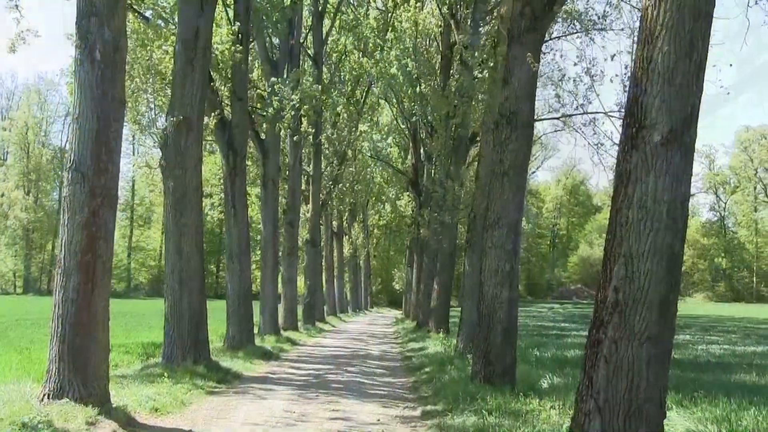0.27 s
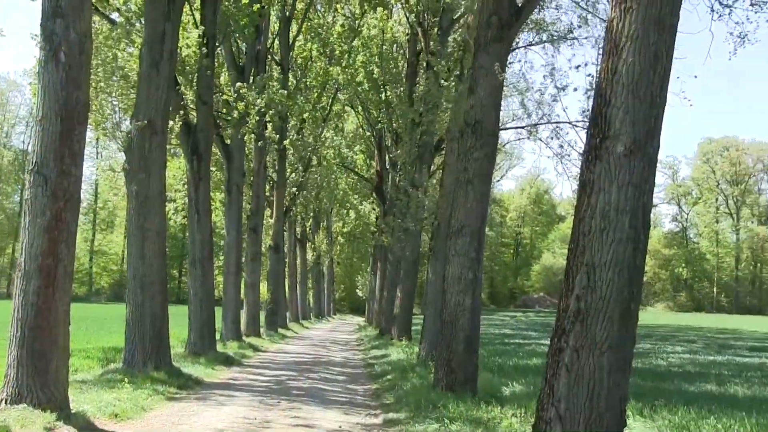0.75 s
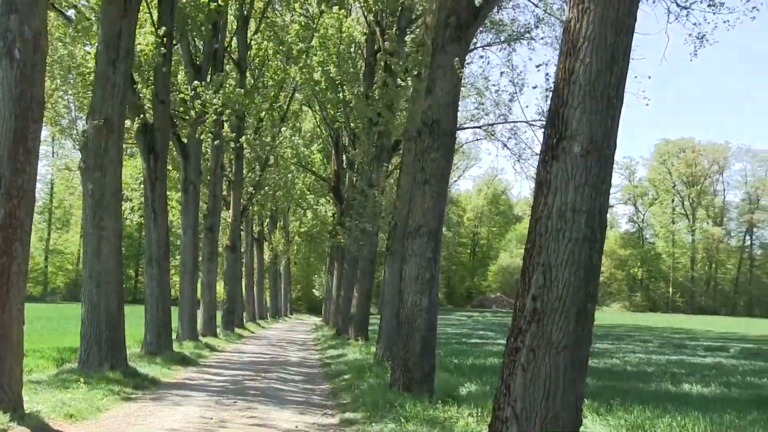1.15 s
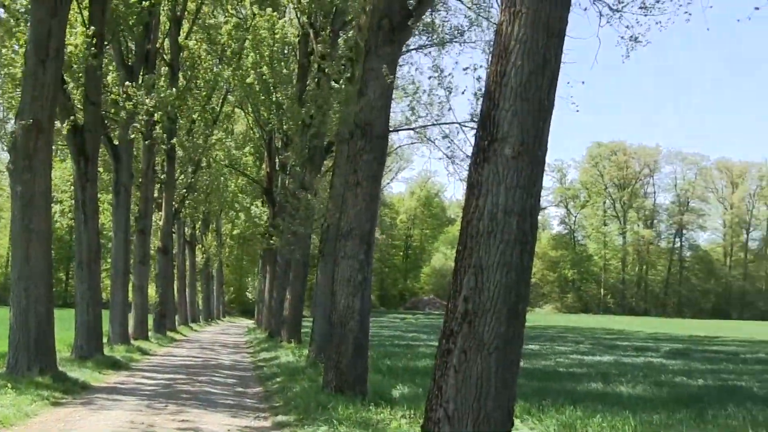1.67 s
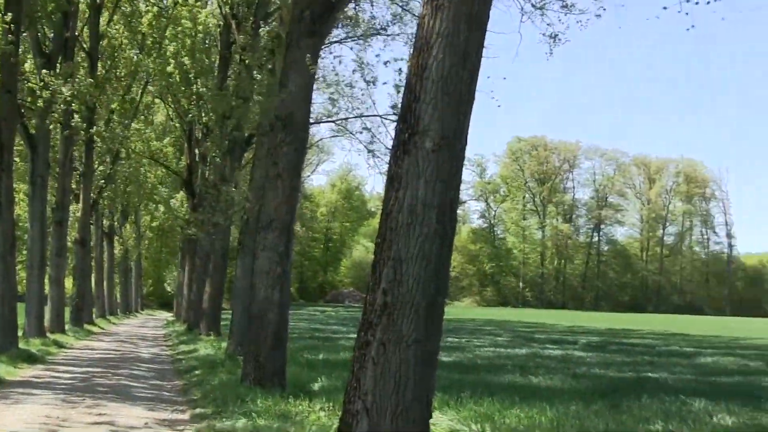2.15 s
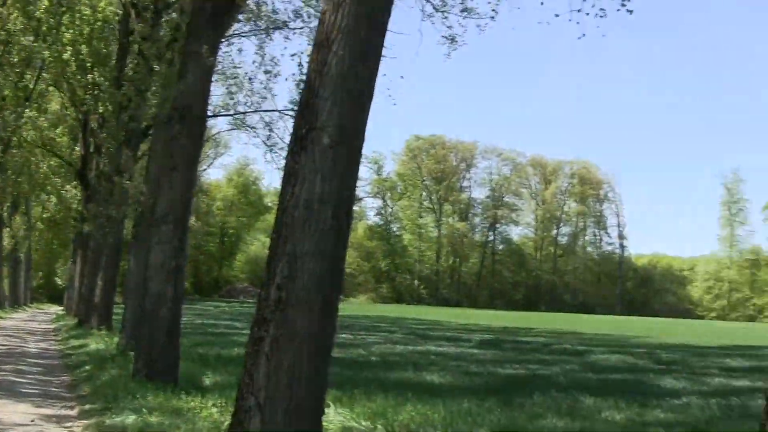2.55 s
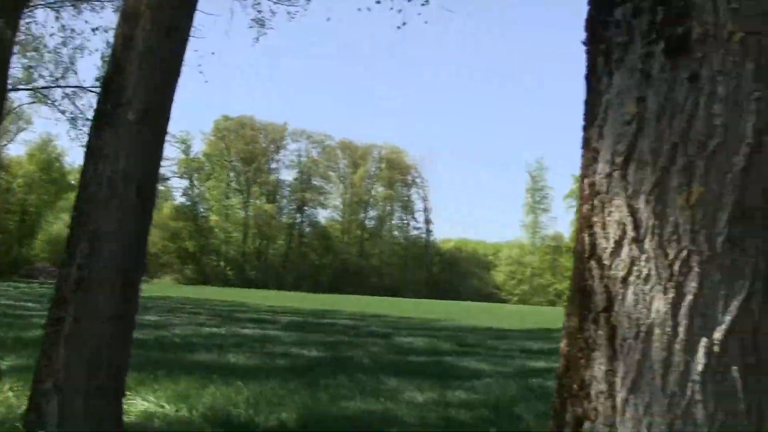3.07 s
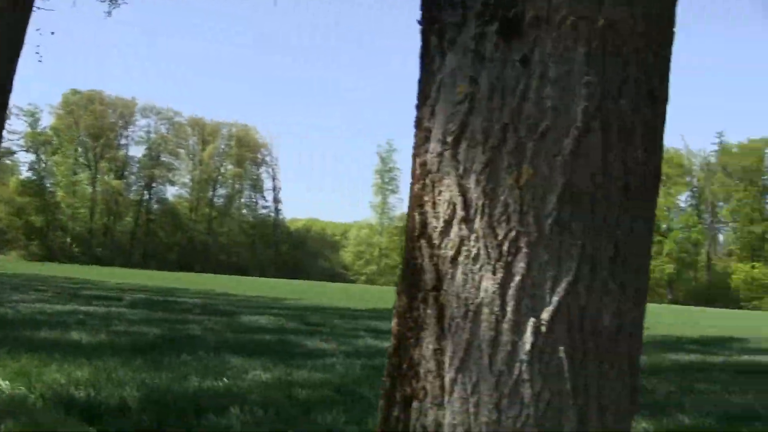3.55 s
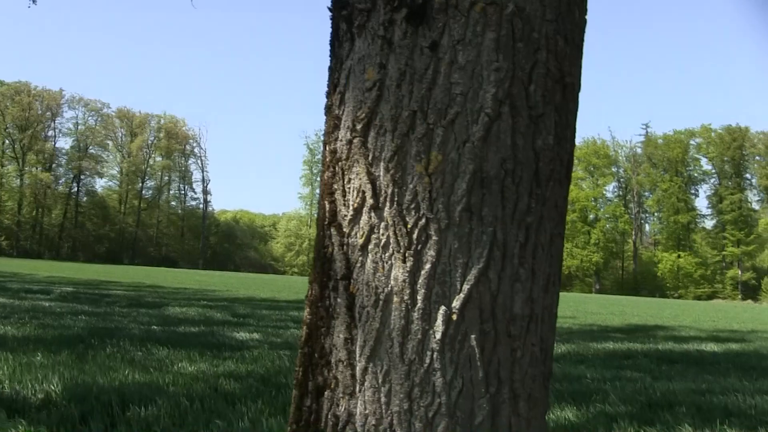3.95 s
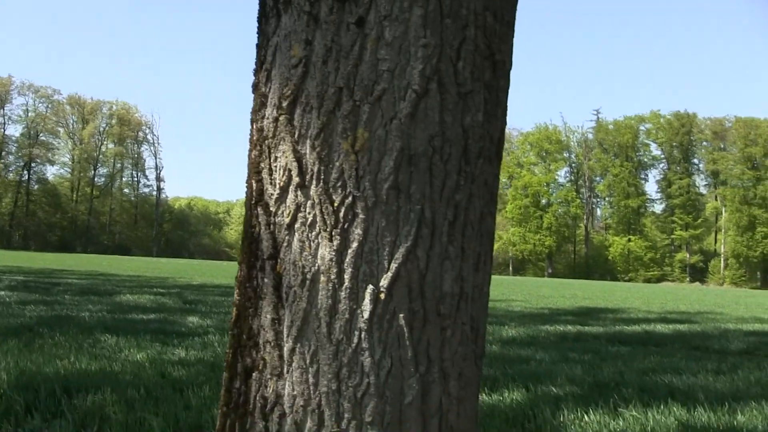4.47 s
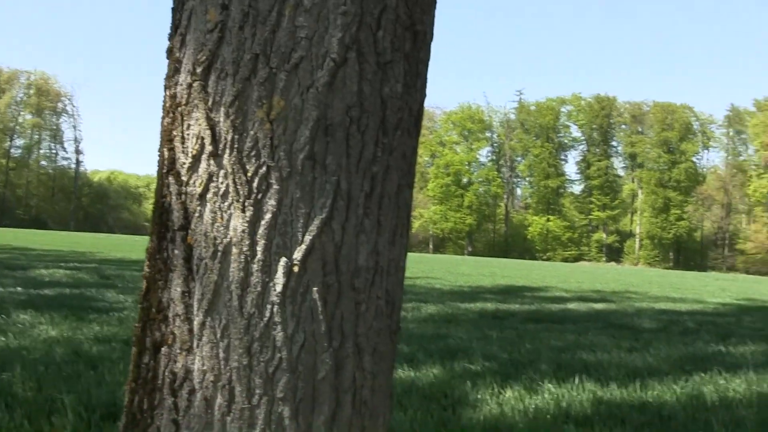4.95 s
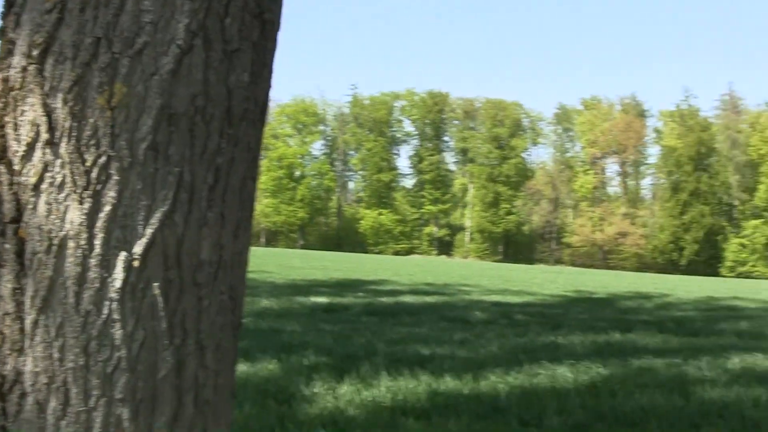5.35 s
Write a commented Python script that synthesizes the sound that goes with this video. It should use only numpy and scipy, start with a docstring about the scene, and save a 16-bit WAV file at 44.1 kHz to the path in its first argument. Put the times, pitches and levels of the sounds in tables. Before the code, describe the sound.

Open air in a tree avenue, heard through a small microphone exposed to wind. From 0 to 0.7 s a soft, patchy hiss of leaves swells in, with only faint low bumps of air. At about 0.8-1.2 s a first gust hits in several muffled, rounded thuds, then eases. Another flurry comes at 1.4-1.7 s, followed by a brief lull with leaves audible. Near 2.1 s a strong double puff strikes, and the rustle suddenly falls much quieter. From there the wind is rough and nearly constant, fluttering and tearing in short bursts, brighter and more crackly around 3.2-3.8 s with hard pops and snaps. It softens slightly near 3.9 s and 4.2-4.4 s, surges around 4.5-4.7 s, and gives its heaviest thump near 5.3 s. Buffeting continues to the end at 5.6 s, mostly centred, with little deep bass and flattened peaks.

```python
"""Gusty wind on a microphone in an avenue of trees in young leaf. Eddies cross the ports as short pressure
wavelets of five sizes, in bursts and lulls; single strong puffs and sharp snaps of air stand out.
Behind them the canopy rustles as patchy filtered noise, heard more quietly from about 2.2 s, where the
recorder turns its gain down; its level follows a drawn curve. The larger eddies are alike at both ports.
The microphone adds hiss, cuts the bass and limits the peaks."""
import sys
import numpy as np
from scipy import signal
from scipy.fft import rfft, irfft, next_fast_len
from scipy.io import wavfile
from scipy.ndimage import uniform_filter1d, minimum_filter1d, map_coordinates

SR = 44100
rng = np.random.default_rng(int(sys.argv[2]) if len(sys.argv) > 2 else 0)


def file_out(sig):
    """Save sig as 16-bit WAV at sys.argv[1]."""
    # one column per channel
    cols = np.atleast_2d(sig).T
    # limit, then scale
    lim = np.clip(cols, -1, 1)
    pcm = np.round(lim * 32767).astype(np.int16)
    wavfile.write(sys.argv[1], SR, pcm)


N = 247401


def amp(db):
    """Decibel law: the amplitude ratio of a level in dB."""
    return 10 ** (np.asarray(db) / 20)


def unit(x):
    """Root-mean-square normalisation: x at rms 1."""
    return x / np.sqrt(np.mean(x ** 2) + 1e-20)


def along(points, hz):
    """Logarithmic frequency scale: (Hz, value) points interpolated on a log axis."""
    f, v = np.transpose(points)
    return np.interp(np.log(hz + 1), np.log(f + 1), v)


def curves(rows):
    """Piecewise-linear envelopes: one value per sample for each column after the time."""
    s, *cols = np.transpose(rows)
    return [np.interp(np.arange(N) / SR, s, c) for c in cols]


def wobble(rate):
    """Band-limited fluctuation: a smooth random curve with rate knots a second."""
    knots = rng.standard_normal(int(N * rate / SR) + 4)
    return map_coordinates(knots, [np.arange(N) * rate / SR])


def filtered(x, response):
    """Linear filtering: the spectrum of x times a response of frequency."""
    m = next_fast_len(N + 8192)
    return irfft(rfft(x, m) * response(np.fft.rfftfreq(m, 1 / SR)), m)[..., :N]


def bump(s, length):
    """Smooth window: a flat-topped bell of height 1 around time s."""
    return np.exp(-.5 * ((np.arange(N) / SR - s) / (length / 2)) ** 4)


def wavelets(s, hz, cycles, size, phase, count):
    """Superposition: a sum of short pressure wavelets with symmetric envelopes, count samples each."""
    k = np.arange(count) - count // 2
    turn = hz[:, None] * k / SR
    envelope = np.hanning(count) * np.exp(-2 * (turn / cycles) ** 2)
    shape = size[:, None] * envelope * np.cos(2 * np.pi * (turn + phase[:, None]))
    at = np.clip(np.round(s * SR).astype(int)[:, None] + k, 0, N)
    return np.bincount(at.ravel(), shape.ravel(), N + 1)[:N]


def steady(x, seconds):
    """Envelope normalisation: x with its slow level evened out."""
    span = int(seconds * SR)
    slow_power = uniform_filter1d(uniform_filter1d(x ** 2, span), span)
    return x / np.sqrt(np.abs(slow_power) + 1e-9)


# level of the rustle as heard through the recorder's gain drops and recoveries: start_s, level_db
CANOPY_LEVEL = [(0, -31.5), (.4, -27.5), (1.8, -26.5), (2.17, -27.5), (2.21, -41), (2.4, -42.5),
                (2.77, -37), (2.84, -40.5), (2.92, -37), (3.08, -47.5), (3.22, -42.5), (3.27, -46.5),
                (3.34, -40), (3.57, -38), (3.62, -43), (3.72, -38), (3.77, -44), (4.47, -40), (4.62, -49.5),
                (4.85, -44.5), (5.22, -41), (5.29, -43), (5.61, -40)]
# spectral shape of the leaves: pitch_hz, level_db (relative)
LEAF_SPECTRUM = [(25, -5), (60, -0.5), (150, -1.5), (400, -1), (900, -3.5), (1400, -3.5), (2500, -8),
                 (4500, -13.5), (7000, -22), (11000, -29), (14500, -34), (15700, -39)]
# stereo width of the leaves: pitch_hz, side_above_mid_db
LEAF_WIDTH = [(1000, -53), (3000, -64), (4500, -17), (7000, -8), (12000, -1), (15500, -6)]


def canopy():
    """Incoherent summation: countless leaves blur into a patchy hiss, wide only in the treble."""
    spectrum = signal.stft(rng.standard_normal((2, N + 512)), nperseg=512)[2]
    patches = rng.standard_normal(spectrum.shape[1:])
    patches = uniform_filter1d(uniform_filter1d(patches, 6, 0), 12, 1)  # over frequency, then time
    pair = signal.istft(spectrum * amp(0.72 * unit(patches)), nperseg=512)[1][:, :N]

    def mid_side_response(hz):
        return amp(along(LEAF_SPECTRUM, hz) + [0 * hz, along(LEAF_WIDTH, hz)])

    mid, side = filtered(pair, mid_side_response)
    return amp(curves(CANOPY_LEVEL)[0]) * unit(np.array([mid + side, mid - side]))


# the microphone's own noise: pitch_hz, density_db (dB per Hz)
HISS_DENSITY = [(4000, -110), (9000, -103), (13000, -101), (15700, -106)]


def hiss():
    """Self-noise: white noise shaped to a spectral density, independent in each channel."""
    bandwidth_db = 10 * np.log10(SR / 2)
    return filtered(rng.standard_normal((2, N)), lambda hz: amp(along(HISS_DENSITY, hz) + bandwidth_db))


RISE_S, FALL_S, SAG_DB = 0.0071, .014, 1.5  # a burst sags by SAG_DB from start to end
FLAP_DB, FLAP_PER_S = 2.5, 27  # the smaller eddies come and go; knots of the curve per second
# a brighter flow carries still more small eddies: (dB gained per dB of middle eddies, dB above large)
SMALL, FINEST = (2, -10), (3, -28)
# air stirring between the bursts: start_s, large_eddies_db, middle_above_large_db
STIR_LEVELS = [(0, -46, 1.5), (.7, -38, -0.5), (1, -17.5, -8), (1.3, -36, -5), (2, -33, -6.5),
               (2.45, -22, -3.5), (3, -19.5, -5.5), (3.9, -24.5, 0), (4.2, -21, -8), (4.4, -23.5, -11),
               (4.7, -30.5, -7.5), (5.61, -17, -13)]
# bursts of eddies at the ports: start_s, length_s, large_eddies_db, middle_above_large_db
EDDY_BURSTS = [(0.073, 0.01, -34, -19), (0.198, 0.036, -27, -18), (.27, 0.02, -23, -26),
               (.35, 0.021, -29, -8.5), (0.51, 0.05, -29.5, -25.5), (0.769, 0.041, -16.5, -19.5),
               (0.851, 0.052, -14, -9.5), (0.942, 0.057, -16, -14), (1.044, 0.011, -16, -26),
               (1.1, 0.039, -13.5, -9), (1.145, 0.039, -19, -16), (1.182, 0.011, -14, -10.5),
               (1.442, 0.055, -14.5, -11), (1.52, .035, -14, -12), (1.587, 0.063, -13, -11.5),
               (1.702, 0.018, -16.5, -13.5), (1.83, 0.02, -22.5, -22), (1.9, .1, -24.5, -17),
               (2.042, 0.021, -13.5, -5.5), (2.114, 0.019, -6.5, -8), (2.185, .18, -11.5, -1.5),
               (2.39, 0.042, -16, -6), (2.504, 0.07, -13, -5.5), (2.619, 0.04, -16, -7),
               (2.693, 0.077, -12, -4.5), (2.799, 0.047, -13.5, -2), (2.908, 0.166, -13.5, -1.5),
               (3.113, 0.046, -15.5, -4), (3.185, 0.081, -15.5, -1), (3.307, 0.06, -13.5, -2),
               (3.427, .11, -14, -0.5), (3.557, 0.11, -17.5, 1), (3.579, 0.019, -17, 5),
               (3.7, 0.057, -14.5, 0.5), (3.797, 0.06, -21.5, 2), (3.829, 0.016, -24, 4.5),
               (3.88, 0.026, -21, -1.5), (3.93, 0.065, -19.5, 0), (4.007, 0.18, -14, -2),
               (4.253, 0.039, -14, -5.5), (4.451, .12, -11.5, -3.5), (4.584, 0.023, -15, 1.5),
               (4.637, .12, -15, -1), (4.697, 0.028, -22.5, 2.5), (4.786, .12, -13, -2.5),
               (4.931, 0.085, -13.5, -4), (5.036, 0.039, -18, -4.5), (5.125, 0.046, -13, -3),
               (5.222, 0.049, -14.5, -6), (5.269, 0.024, -12, -1), (5.319, 0.077, -11.5, -2),
               (5.431, 0.039, -15.5, -5.5), (5.527, 0.025, -17, -1.5), (5.586, .04, -11, -3)]
# air stands still for a moment: centre_s, depth_db, length_s
STILL_MOMENTS = [(1.022, 10, 0.024), (2.103, 11, 0.009), (2.14, 10.5, 0.014), (2.677, 24, 0.026),
                 (3.183, 13.5, 0.016), (4.57, 11, 0.013), (5.214, 6.5, .017), (5.309, 18, 0.024),
                 (5.566, 11, 0.021)]


def sizes(large_db, bright_db):
    """Turbulent spectrum: levels in dB of large, middle, small and finest eddies."""
    smaller = [large_db + gain * bright_db + above_db for gain, above_db in (SMALL, FINEST)]
    return [large_db, large_db + bright_db] + smaller


def flow():
    """Intermittency: bursts rise, sag and fall, adding their power to the stir; lulls lower all sizes."""
    t = np.arange(N) / SR
    power = amp(2 * np.array(sizes(*curves(STIR_LEVELS))))  # doubled dB gives power
    for s, length, db, bright_db in EDDY_BURSTS:
        near = slice(max(int((s - .1) * SR), 0), int((s + length + .15) * SR))
        early = np.maximum(s - t[near], 0) / RISE_S
        late = np.maximum(t[near] - s - length, 0) / FALL_S
        progress = (t[near] - s).clip(0, length) / length
        sag = amp(SAG_DB * (1 - 2 * progress))  # a factor on power
        burst_power = amp(2 * np.array(sizes(db, bright_db)))[:, None]
        power[:, near] += burst_power * np.exp(-early ** 2 - late ** 2) * sag
    flap_db = FLAP_DB * wobble(FLAP_PER_S) * np.array([[0], [.5], [1], [1]])  # large ones hold still
    lull_db = sum(db * bump(s, length) for s, db, length in STILL_MOMENTS)
    return 10 * np.log10(power) + flap_db - lull_db


def eddies(s, strength, kind, count):
    """Vortex shedding: each vortex gives a wavelet of its own pitch; the higher ones are weaker."""
    hz, octaves, cycles, scatter_db, db = kind
    draw = rng.standard_normal((len(s), 3))
    rise = octaves * np.clip(draw[:, 1], -2, 2.5)
    size = amp(scatter_db * (0.77 * strength + .5 * draw[:, 0]) - 4.4 * rise)
    train = wavelets(s, hz * 2 ** rise, cycles, size, draw[:, 2], count)
    return amp(db) * unit(steady(train, 0.03))


# five eddy sizes, slowest first: pitch_hz (centre), pitch_scatter_octaves, life_cycles,
# size_scatter_db (before weighting), level_db (relative to the flow)
EDDY_SIZES = [(157, 0.16, 1.13, 9.5, -22.5), (374, 0.48, 2.14, 3, -3.5), (700, 0.51, 1.03, 2, 1),
              (1772, 0.3, 1.18, 2.5, -3.5), (3760, 0.29, 1.9, -2, -9)]


def buffet(levels):
    """Turbulent pressure: vortices pass both ports, all sizes sharing moments and part of their strength."""
    s = rng.uniform(0, N / SR, 5600)
    clumps = wobble(60)
    strength = rng.exponential(1, len(s)) + 0.33 * clumps[(s * SR).astype(int)]
    large_db, middle_db, small_db, finest_db = levels
    slowest_db = large_db - 1.3 * (middle_db - large_db)  # a duller flow carries more of them
    slowest = amp(slowest_db) * eddies(s[::3], strength[::3], EDDY_SIZES[0], count=1280)
    large = amp(large_db) * eddies(s, strength, EDDY_SIZES[1], count=640)
    middle = amp(middle_db) * eddies(s, strength, EDDY_SIZES[2], count=256)
    small = amp(small_db) * eddies(s, strength, EDDY_SIZES[3], count=128)
    finest = amp(finest_db) * eddies(s, strength, EDDY_SIZES[4], count=64)
    middle_envelope = np.abs(signal.hilbert(middle))
    riding = (small + finest) * unit(steady(middle_envelope ** 0.63, 0.044))  # on the middle eddies
    # further small eddies differ by port; same columns as the eddy sizes
    apart = amp(small_db) * eddies(s, strength, (2311, 0.65, 13.0, 11.5, -20.5), count=128)
    mid = slowest + large + middle + riding
    return np.array([mid + apart, mid - apart])


# strongest single eddies: centre_s, level_db (peak at the ports), pitch_hz
STRONG_PUFFS = [(0.073, -21, 260), (0.203, -13, 326), (0.2881, -11.5, 340), (0.362, -15, 255),
                (0.587, -15.5, 229), (0.8016, -3, 323), (0.857, -6, 415), (0.91, -4.5, 490),
                (0.9581, -4.5, 714), (0.9895, -5, 412), (1.0456, -8, 258), (1.0963, -3.5, 310),
                (1.1226, -1, 313), (1.192, -3, 448), (1.455, -4, 303), (1.6264, -4, 356),
                (1.7129, -7.5, 358), (1.8316, -13, 406), (2.0483, -2.5, 348), (2.1129, 2, 383),
                (2.1952, 1, 425), (2.211, 3, 440), (2.5405, -3.5, 485), (2.733, -5, 390), (2.7684, -1, 465),
                (2.8147, -2, 437), (2.9579, 3, 482), (3.2195, -2, 390), (3.2451, 9, 569),
                (3.3523, 0.5, 700), (3.4762, 6, 714), (3.5671, -7, 560), (3.656, -2, 677), (3.7385, 5, 474),
                (3.751, 6, 553), (3.786, -2.5, 665), (3.993, -1, 740), (4.1792, -6.5, 490),
                (4.2694, -6, 583), (4.299, -3, 700), (4.385, -8.5, 690), (4.4583, -5, 470), (4.488, 0, 600),
                (4.5266, 3, 620), (4.5866, -9, 497), (4.72, 6, 626), (5.0111, -1, 392), (5.1369, -2.5, 545),
                (5.2789, 13, 580), (5.3328, -7, 546)]


def puffs():
    """Coherent pressure: each puff is one strong eddy, alike at both ports."""
    s, db, hz = np.transpose(STRONG_PUFFS)
    return wavelets(s, hz, 0.99, amp(db), rng.standard_normal(len(s)), count=768)


# lesser snaps come at random and follow the small eddies
LESSER_PER_S, LESSER_TREBLE_DB, SNAP_PAN_DB = 70, -37, .4
LESSER_DB, LESSER_SCATTER_DB = 1.5, 3  # above the small eddies
# sharpest snaps of air at a port edge: centre_s, level_db (nominal), treble_above_level_db (nominal)
SHARP_SNAPS = [(2.2276, -17.1, -31), (2.2935, -9, -43), (2.9593, -16, -34), (3.016, -12, -38),
               (3.0444, -16, -43), (3.2033, -14, -32), (3.2261, -15, -36), (3.3583, -16, -24),
               (3.5627, -10, -37), (3.5899, -10, -30), (3.5975, -19.5, -33), (3.6037, -20.5, -18),
               (3.641, -13.3, -44), (3.7305, -9, -38), (3.7354, -9, -33), (3.8302, -15, -22.5),
               (3.851, -6, -45), (3.9505, -17, -24), (3.957, -13.5, -27), (3.993, -23, -26),
               (4.0066, -11, -26), (4.1782, -38, -35), (4.2993, -27, -26), (4.5897, -8, -22.5),
               (4.5958, -22, -36), (4.701, -13, -35), (4.708, -9, -31), (4.7201, -7, -21),
               (4.7318, -11, -30), (4.753, -25, -26), (4.767, -24, -27), (4.8728, -21, -32),
               (5.1353, -16, -30), (5.2758, -7, -34), (5.334, -30, -29), (5.37, -23, -25),
               (5.587, -20, -15)]


def snaps(small_db):
    """Impulsive broadband sound: each snap is a ragged cluster of four wavelets with brighter edges."""
    at = rng.integers(0, N, int(LESSER_PER_S * N / SR))
    chance = rng.standard_normal((len(at), 2))
    lesser_db = small_db[at] + LESSER_DB + LESSER_SCATTER_DB * chance[:, 0]
    lesser = np.c_[at / SR, lesser_db, LESSER_TREBLE_DB + 2 * chance[:, 1]]
    rows = np.r_[lesser, SHARP_SNAPS]
    rows = np.c_[rows, SNAP_PAN_DB * rng.standard_normal(len(rows))]
    s, db, treble_db, pan_db = np.repeat(rows, 4, axis=0).T
    draw = rng.standard_normal((len(s), 5))
    s = s + .0011 * draw[:, 0]  # the cluster spreads over a few milliseconds
    body_hz = 2600 * 2 ** (.22 * draw[:, 1])
    edge_hz = 6000 * 2 ** (.28 * draw[:, 3])
    out = []
    for side in (.5, -.5):
        size = amp(db + side * pan_db)
        body = wavelets(s, body_hz, 1.3, .65 * size, draw[:, 2], count=128)
        edge = wavelets(s, edge_hz, 1.5, 1.6 * size * amp(treble_db), draw[:, 4], count=64)
        out.append(body + edge)
    return np.array(out)


def scene():
    """Linear superposition: air at the ports over the far canopy."""
    levels = flow()
    return canopy() + buffet(levels) + puffs() + snaps(levels[2])


LOW_CUT_HZ, TOP_HZ = 150, 15700


def low_cut(hz):
    """High-pass response: second-order slope below the corner, without phase shift."""
    ratio = hz / LOW_CUT_HZ
    return ratio ** 2 / np.sqrt(1 + ratio ** 4)


def record(dry):
    """Transducer chain: own hiss, wind low-cut, fast look-ahead limiter at full scale, band limit."""
    cut = filtered(dry + hiss(), low_cut)
    need = 1 / np.maximum(np.abs(cut).max(axis=0), 1)  # one gain for both channels
    gain = uniform_filter1d(minimum_filter1d(need, size=121), size=101)
    return np.clip(filtered(cut * gain, lambda hz: hz < TOP_HZ), -1, 1)


dry = scene()
out = record(dry)
file_out(out)
```